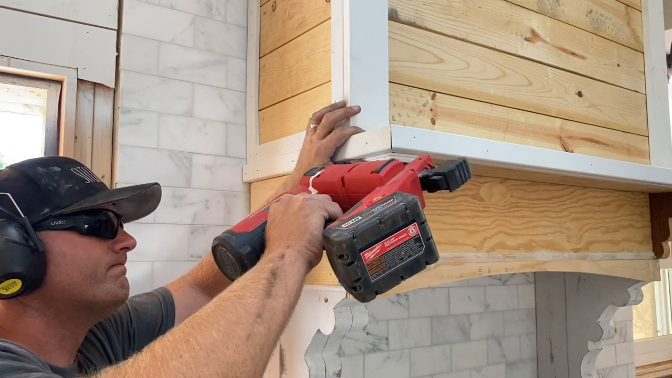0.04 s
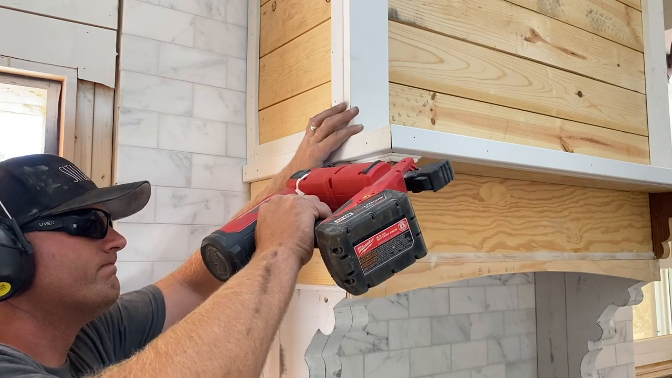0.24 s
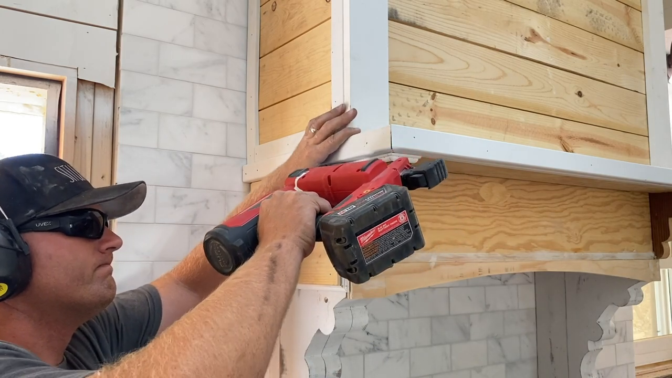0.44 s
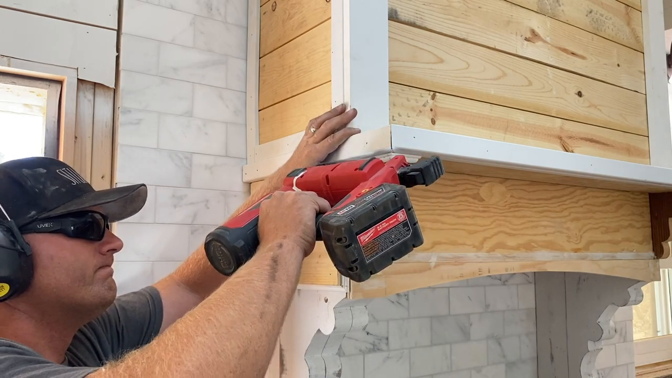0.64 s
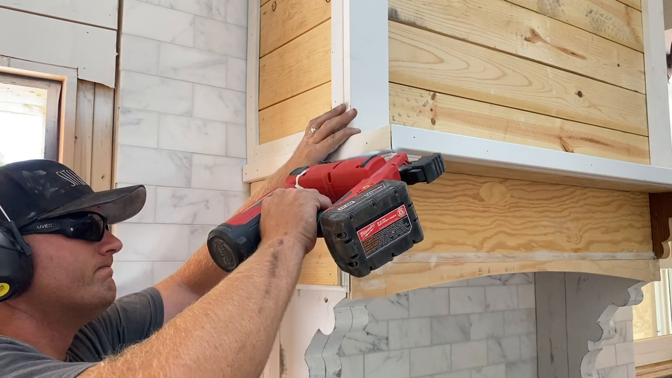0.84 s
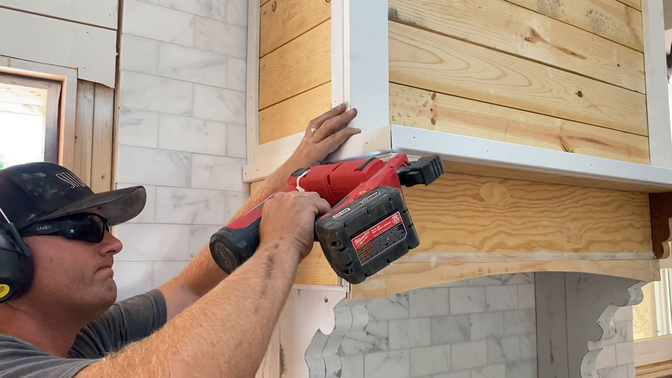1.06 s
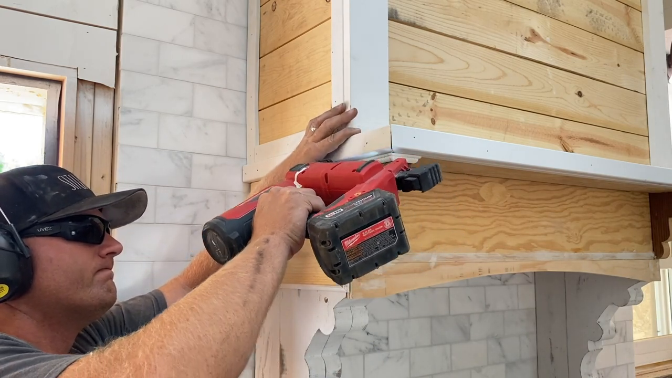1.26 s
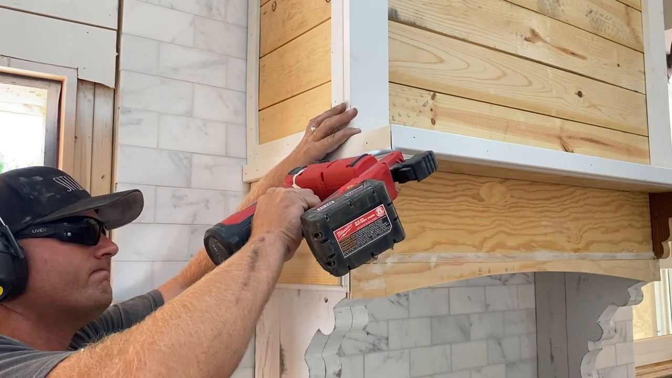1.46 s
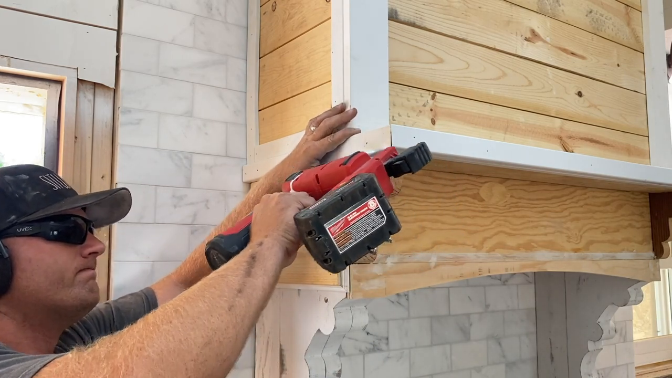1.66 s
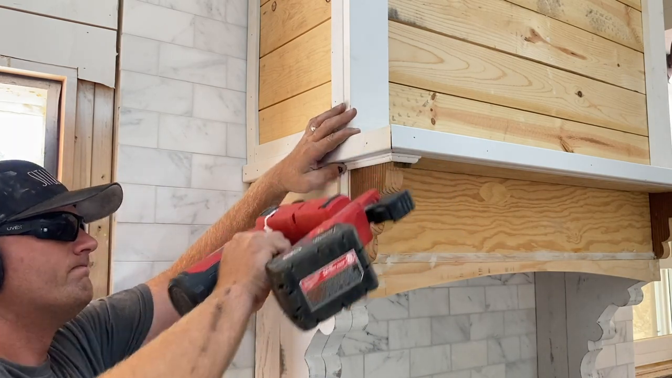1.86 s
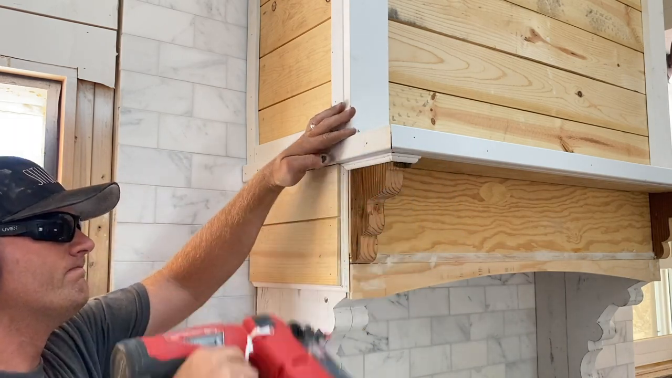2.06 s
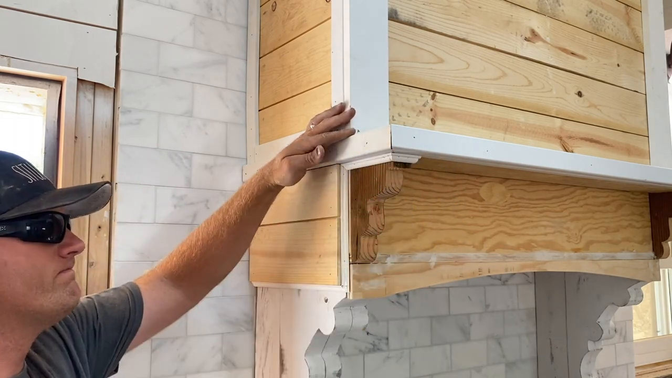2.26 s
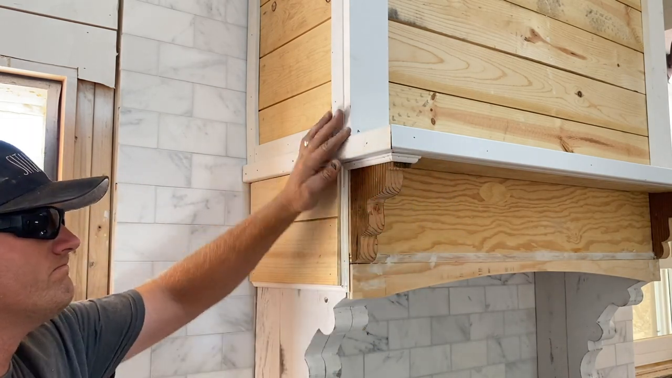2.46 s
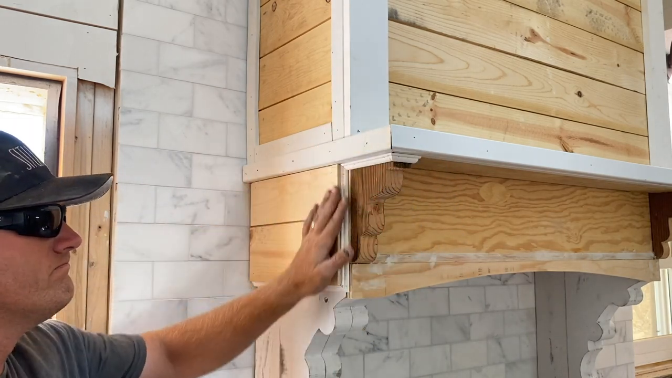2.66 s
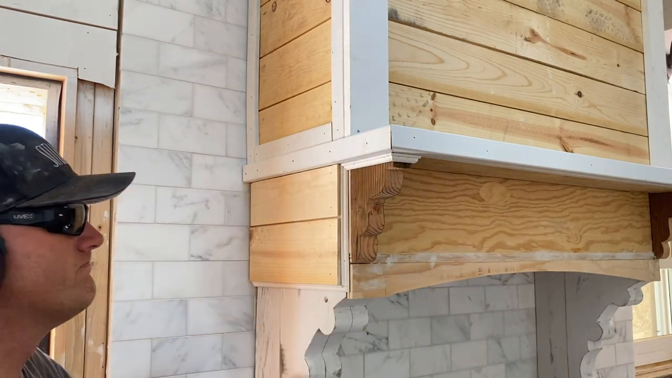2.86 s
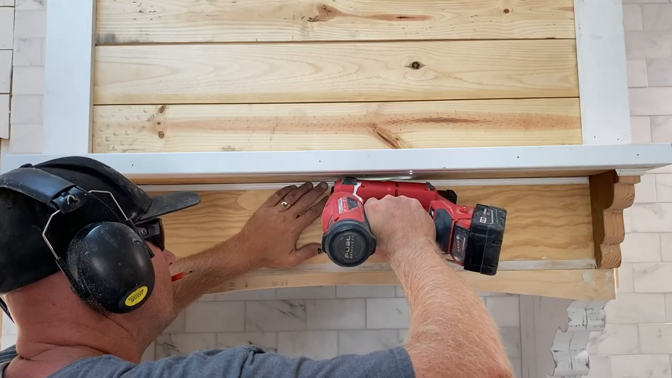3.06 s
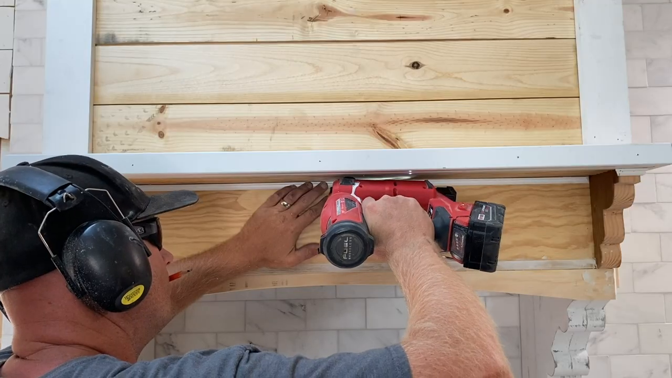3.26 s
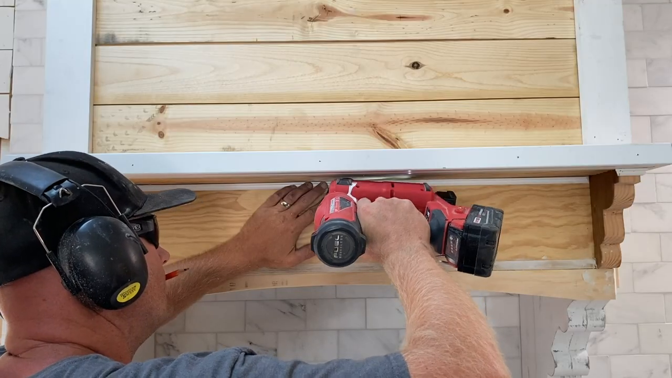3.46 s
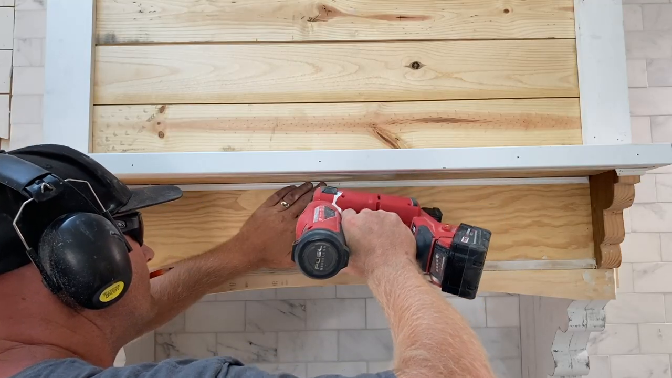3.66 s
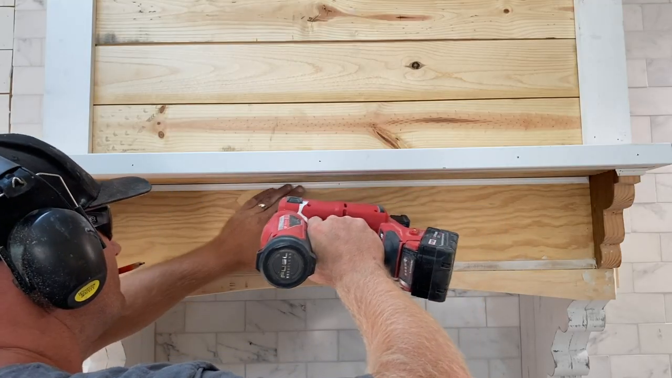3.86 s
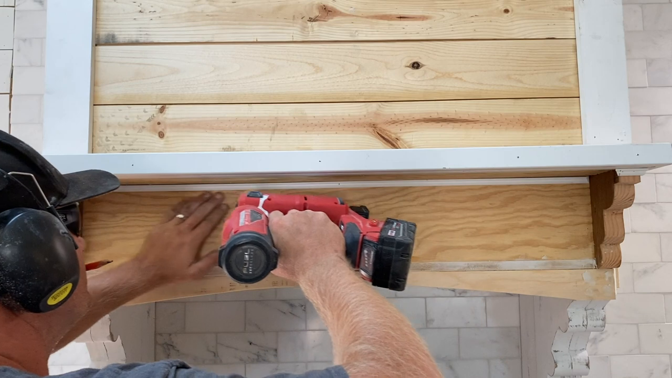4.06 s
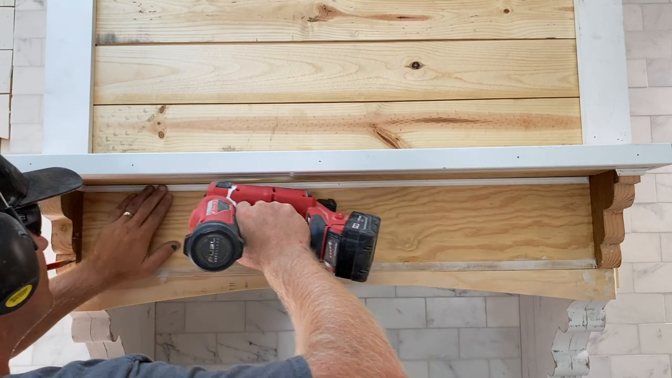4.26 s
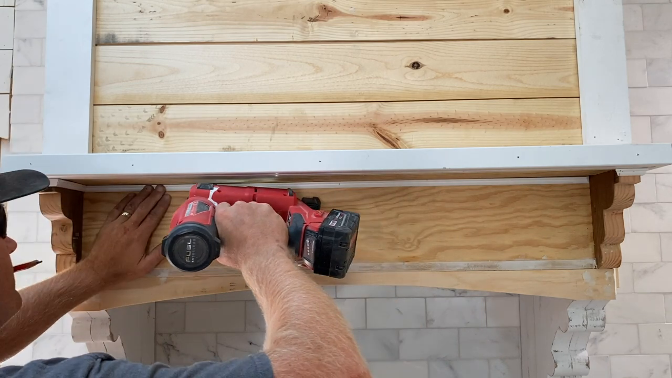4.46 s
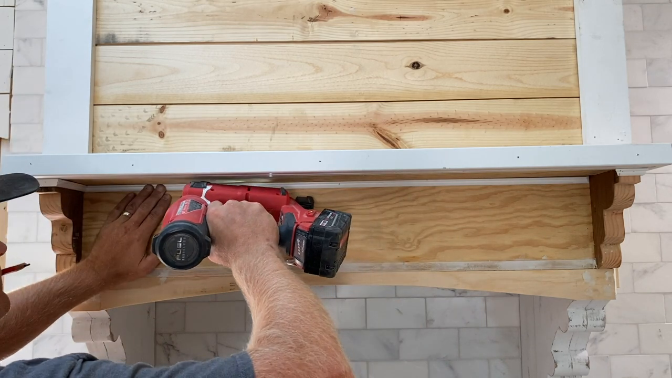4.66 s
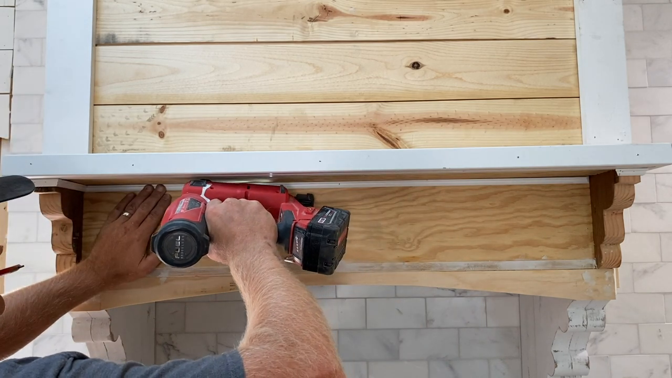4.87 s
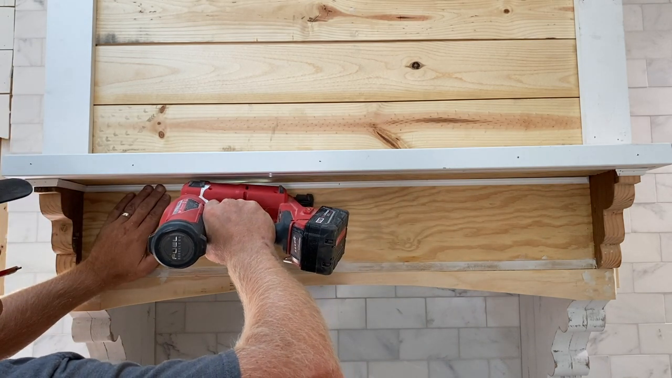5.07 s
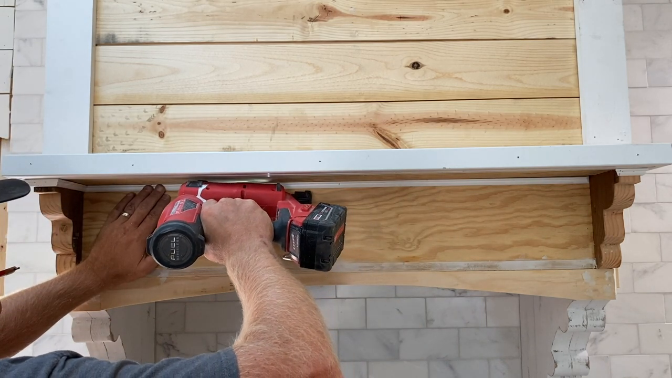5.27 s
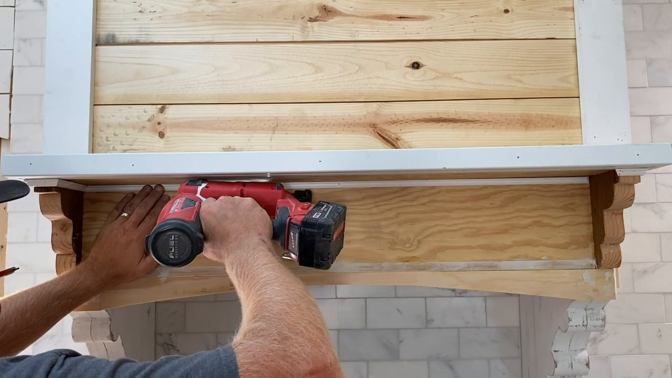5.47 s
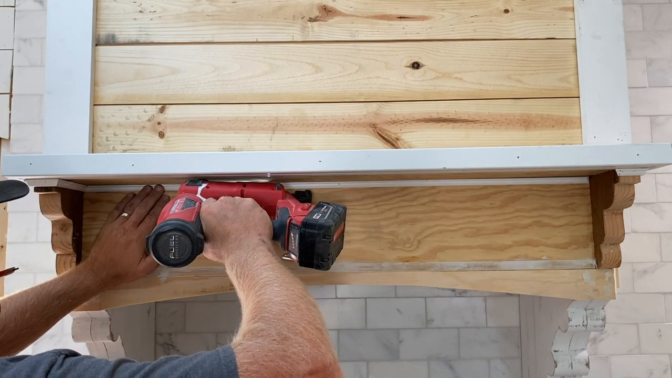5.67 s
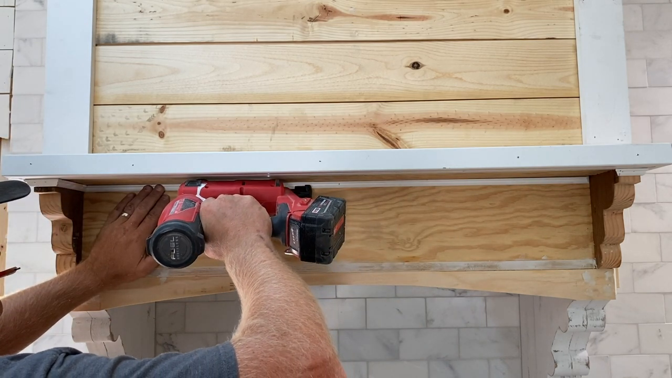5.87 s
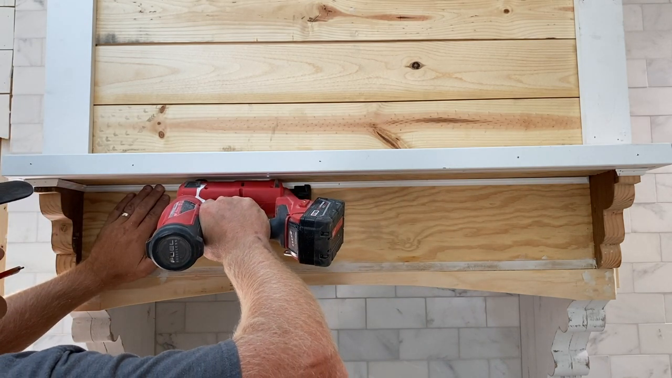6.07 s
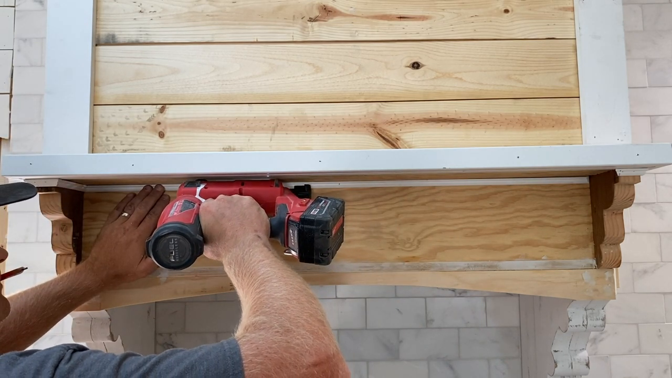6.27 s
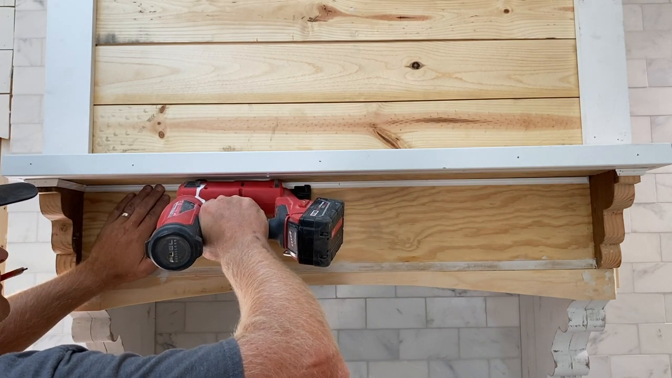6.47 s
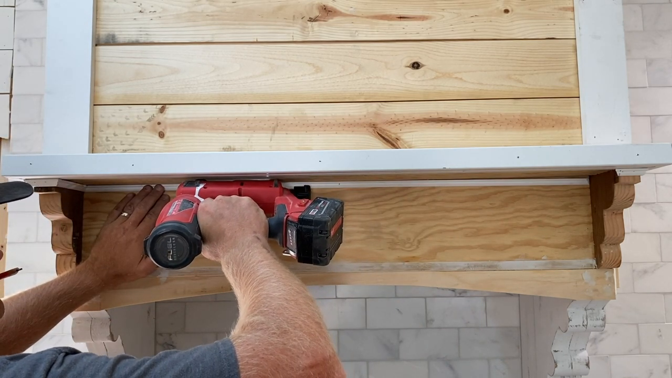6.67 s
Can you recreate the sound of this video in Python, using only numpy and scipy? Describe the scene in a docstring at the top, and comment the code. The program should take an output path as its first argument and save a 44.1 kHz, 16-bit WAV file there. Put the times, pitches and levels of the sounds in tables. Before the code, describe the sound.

Three sharp, booming nail gun shots into wooden trim, each trailed by a brief geared whine, with faint tool clicks between them indoors.

```python
"""A tiled room, the microphone close to a wooden range hood where a battery nail gun fastens trim.
At each shot the gears clack in and spin up, the driver slams the nail home and the boards boom; then the
motor winds the piston back in two pulls, slowing under each load, with a crack of the catch between.
Between shots the tool clicks on the trim, a hand slides over the wood and birds call far off outside.
Room air, a machine hum and a deep drone lie underneath, heard from beside the hood, then from in front."""
import sys
import numpy as np
from scipy import signal
from scipy.fft import rfft, irfft, next_fast_len
from scipy.io import wavfile

SR = 44100
rng = np.random.default_rng(int(sys.argv[2]) if len(sys.argv) > 2 else 0)


def log_audio(samples):
    """Write samples as a 16-bit WAV file to the path given in sys.argv[1]."""
    # one column per channel
    frames = np.atleast_2d(samples).T
    # limit to full scale, then quantise
    limited = np.clip(frames, -1, 1)
    pcm = np.round(limited * 32767).astype(np.int16)
    wavfile.write(sys.argv[1], SR, pcm)


N = 296339
LEAD = SR // 2  # samples before time zero, so the scene opens on the end of a shot
TIME = np.arange(-LEAD, N) / SR

# The shots, close up. Each row: firing time in seconds, base levels in dB of spin-up, driver, thump, boom
# and crack, the crack's ring in Hz, base levels in dB of gear rattle and whine, brightness from 0 to 1.
SHOTS = [(-.209, -24.5, -9, -16.5, -23, -2, 3770, -31.5, -32.5, 0.71),
         (1.6670, -24, -8.5, -14, -23, -4, 4550, -30, -32.5, .85),
         (3.2540, -23, -10, -18, -20.5, -6.5, 3180, -31.5, -30, .42),
         (6.5675, -21.5, -10, -16.5, -22, -5, 3150, -30, -31.5, .5)]
BRIGHTNESS_TILT_DB = 1.5  # per octave: a gun turned toward the microphone sounds brighter
# Gears clacking in and biting. Each row: start in seconds, level in dB, ring in Hz, share of ring.
GEAR_CLACKS = [(1.6385, -17.5, 3780, 0.8), (1.658, -18.5, 1256, .7), (3.2017, -25, 3510, 0.38),
               (3.2075, -16.5, 2540, .25), (3.225, -25, 3700, 2.5), (3.241, -15, 3430, 1.4),
               (6.5388, -16.5, 3540, 1.1), (6.559, -17.5, 3280, 1.9)]
# The two pulls on the piston. Each row: end in seconds after firing, time under load in seconds,
# mesh rate at full load in Hz, level boost in dB.
PISTON_PULLS = [(0.1352, .1, 1643, 1), (.256, .089, 1537, 1.5)]
SPIN_FROM_HZ, FIRING_HZ, FREE_HZ = 1000, 1401.4, 2002  # mesh rates: spinning up, firing, unloaded
# The whine of the gears. Each row: multiple of the mesh rate, relative level in dB.
GEAR_TONES = [(1, -6.5), (2, -4.5), (2.4, -3.5), (3, -7.5), (4, -8), (4.5, -16), (5, -8.5), (6.001, -9),
              (7, -15)]
# Gearbox resonances that swell a passing tone. Each row: centre in Hz, width in Hz, added gain.
GEARBOX_RESONANCES = [(3660, 550, 2.1), (5150, 350, 1.5), (7600, 770, .7)]
# The colour of each part, struck or rubbed. Each row: frequency in Hz, relative level in dB.
HOUSING_SPECTRUM = [(100, -36.5), (350, -10.5), (800, 0), (1300, -7), (2000, -6.5), (3200, -2.5),
                    (4200, -6.5), (5200, -4), (6100, -11), (7600, -7), (10000, -12), (13000, -15.5),
                    (16000, -21)]
DRIVER_SPECTRUM = [(100, -20), (400, -1.5), (900, 9), (1600, -6), (3000, 0.5), (4000, -7), (5200, -7.5),
                   (6200, -11), (7500, -3.5), (9000, -10), (10400, -6), (12000, -12.5), (16000, -18)]
CATCH_SPECTRUM = [(100, -24), (300, -9.5), (750, 4), (1400, -8), (2700, -1), (3900, -6), (4600, -1),
                  (6000, -6.5), (7300, -2), (9000, -9), (11000, -9.5), (13000, -17), (16000, -19.5)]
BOARD_SPECTRUM = [(25, -27.5), (55, -10.5), (95, 2.5), (260, -6.5), (420, 1.5), (600, -3), (800, -3),
                  (1300, 0.5), (1800, -7), (2800, -8), (5000, -25), (12000, -46)]
TIP_SPECTRUM = [(710, -33), (1200, -6), (2320, -7.5), (2790, -2), (3910, -5.5), (4360, -1), (6800, -5),
                (8530, -3.5), (9310, -6), (14000, -13.5), (16000, -32)]
SKIN_SPECTRUM = [(300, -15), (1800, 0), (3500, -1), (6000, -4), (9000, -5.5), (12000, -7.5), (16000, -13.5)]
# The hood's ringing boards. Each row: pitch in Hz, relative level in dB, seconds to fall 60 dB.
BOARD_MODES = [(167.9, 4, .35), (213, -5.5, .3), (384.5, -4, 0.51), (419, -7, 0.46), (584, -2.5, .3),
               (785.4, -2, 0.9), (1000, -7.5, 0.43), (1136, -2.5, 0.42), (1258, -2.5, .35)]
# Tip and trigger clicks. Each row: start in seconds, level in dB, decay in seconds, tilt in dB an octave.
TOOL_CLICKS = [(0.8244, -40.5, 0.0081, -1), (.874, -49, .003, -6), (1.1343, -46, .007, -9),
               (1.5824, -49.5, 0.01, -2), (1.618, -45.5, .006, -5.5), (2.209, -40, 0.0036, -2.5),
               (2.965, -55, .0014, -2.5), (3.133, -50, 0.0025, -7), (3.1465, -47, 0.0061, -4),
               (3.182, -41.5, .003, -2.5), (4.859, -42.5, 0.0056, -4), (4.869, -37.5, 0.0023, -5.5),
               (4.957, -50.5, 0.0022, -5.5), (5.063, -50.5, 0.0031, -7), (5.226, -52.5, 0.0023, -13.5),
               (5.753, -48, 0.0019, 0), (6.466, -51, .0018, -7), (6.484, -45, 0.0032, -1.5),
               (6.5174, -45, 0.0047, -2.5)]
# A brief low hum fading away, then soft bumps against the hood.
# Each row: start in seconds, level in dB, pitch in Hz, decay in seconds.
BRIEF_HUM_AND_BUMPS = [(2.97, -45, 107.5, 0.14), (4.86, -45.5, 747, 0.013), (5.954, -36, 275.3, 0.027),
                       (5.99, -34.5, 72.1, 0.041), (6.111, -47, 69, 0.035), (6.106, -44.5, 398, 0.021),
                       (6.241, -43.5, 60.9, 0.055)]
# A hand on the wood. Each row: start and length in seconds, level in dB, tilt in dB an octave.
HAND_STROKES = [(2.478, .14, -65, 3.5), (2.593, 0.12, -61.5, 4.5), (2.727, 0.11, -56.5, -1),
                (2.892, 0.049, -57, -5.5), (3.819, 0.086, -59.5, -7), (4.321, .06, -70.5, -4.5),
                (5.822, 0.49, -67.5, -7.5)]
# Thin, far whistles. Each row: start and length in seconds, pitch in Hz, share of pitch lost, level in dB.
BIRD_WHISTLES = [(.36, 0.27, 2650, 0.017, -73.5), (0.646, 0.093, 2660, 0.11, -74),
                 (0.737, .14, 3080, .03, -76), (1.332, 0.17, 2154, 0.066, -75),
                 (2.224, .24, 2634, 0.29, -70), (4.762, .1, 3050, .04, -71),
                 (5.389, .16, 3300, 0.042, -69.5), (5.56, .17, 3220, 0.042, -71.5),
                 (6.146, 0.15, 3350, 0.065, -66)]
# Raspy, far chirps. Each row: start and length in seconds, opening pitch in Hz, level in dB.
BIRD_CHIRPS = [(2.942, .2, 4550, -69.5), (3.92, .08, 4060, -74.5), (4.119, .16, 4390, -76),
               (4.387, .16, 4170, -69), (4.717, 0.14, 3850, -68.5), (5.201, 0.11, 4740, -67.5),
               (5.348, 0.16, 4290, -67), (5.531, .15, 3860, -67.5), (6.122, .18, 4040, -67)]
# The decay of the tiled room. Each row: frequency in Hz, seconds to fall 60 dB.
ROOM_DECAY = [(100, .4), (400, .73), (1500, .77), (3500, .62), (6000, .52), (10000, .41), (16000, .32)]
# Room air beside the hood and in front of it. Each row: frequency in Hz, relative level in dB.
SIDE_AIR = [(12, -48.5), (20, -24), (53, -3.5), (88, -6.5), (120, -1), (150, -4), (172, -8), (310, -3.5),
            (388, -12), (422, -12), (949, -16), (1760, -30.5), (2460, -39), (2820, -40), (16000, -68)]
FRONT_AIR = [(12, -41), (20, -30), (53, -4.5), (113, -2), (182, -4), (198, -9.5), (357, -8), (388, -16.5),
             (472, -8), (590, -17), (660, -13), (1000, -25), (2200, -37.5), (5530, -45.5), (16000, -74)]
MIC_MOVE_S = 2.965  # the microphone goes from the side to the front
# A steady machine hum. Each row: pitch in Hz, level in dB.
HUM_TONES = [(133, -59), (177.5, -58.5), (221, -63), (266, -67.5), (312, -64), (355, -63.5), (533, -68.5)]
# A deep drone that comes and goes in front of the hood. Each row: time in seconds, level in dB.
DRONE_LEVELS = [(3.5, -60), (3.69, -45.5), (3.8, -54), (4.21, -47.5), (4.52, -54), (4.56, -71.5),
                (4.83, -50.5), (5.1, -48.5), (5.22, -62.5), (5.9, -53)]


def nail_gun():
    """Every shot, close to the microphone; returns the gears (rattle, whine) and the blows."""
    gears, blows = np.zeros((2, len(TIME))), np.zeros(len(TIME))
    for s, spin_db, driver_db, thump_db, boom_db, crack_db, crack_hz, rattle_db, whine_db, bright in SHOTS:
        tilt_db = BRIGHTNESS_TILT_DB * (bright - .5)
        add(gears, s - .029, spin_up(spin_db, bright, length_s=.029))
        driver = blow(DRIVER_SPECTRUM, driver_db, rise_s=.0056, decay_s=.0026, tilt_db=1.3 + tilt_db)
        add(blows, s, driver)
        add(blows, s + .002, boards(thump_db, boom_db))
        add(gears, s, wind_back(rattle_db, whine_db, bright))
        catch = blow(CATCH_SPECTRUM, crack_db, rise_s=.0021, decay_s=.0027, tilt_db=.48 + tilt_db,
                     ring_hz=crack_hz, ring_share=.37)
        add(blows, s + .135, catch)
    for s, db, ring_hz, ring_share in GEAR_CLACKS:
        clack = blow(HOUSING_SPECTRUM, db, rise_s=.0032, decay_s=.0075, tilt_db=1.6,
                     ring_hz=ring_hz, ring_share=ring_share)
        add(blows, s, clack)
    return gears, blows


def blow(spectrum, db, rise_s, decay_s, tilt_db, ring_hz=3000, ring_share=0, size=4096):
    """A blow on hard parts: a dense cluster of short resonances, one of which may stand out."""
    t = np.arange(size) / SR
    shape = strike(t, rise_s, decay_s)
    cluster = rfft(shape * rng.standard_normal(size))
    cluster /= (abs(cluster) + 1e-9) ** .22  # evens out the noise's spectrum for a smoother crack or click
    body = colour(irfft(cluster), spectrum, tilt_db) * signal.windows.hann(2 * size)[size:]
    ring = unit(shape * np.sin(2 * np.pi * ring_hz * t))
    return amp(db) * unit(unit(body) + ring_share * ring) * np.sqrt(np.mean(shape ** 2))


def boards(thump_db, boom_db, high_hz=1000, low_hz=130, heave_hz=110, size=32768):
    """Bending waves arrive highs first, as a falling thump; the panel heaves, the hood booms and rings."""
    t = np.arange(size) / SR
    hz = low_hz + (high_hz - low_hz) * np.exp(-t / .0055)
    thump = np.sin(2 * np.pi * np.cumsum(hz) / SR) * np.sqrt(2 * strike(t, .0061, .005))
    swing = 2 * np.pi * heave_hz * (t - .012)
    heave = amp(-6) * 2 * swing * np.exp(-swing ** 2 / 2)
    boom = colour(rng.standard_normal(size), BOARD_SPECTRUM) * strike(t, rise_s=.005, decay_s=.066)
    modes = sum(amp(db - 60 * t / t60) * np.sin(2 * np.pi * (f * t + rng.random()))
                for f, db, t60 in BOARD_MODES)
    ring = amp(-10) * modes * np.minimum(t / .005, 1)
    return amp(thump_db) * (thump + heave) + amp(boom_db) * (boom + ring)


def spin_up(db, brightness, length_s, swell_db=8.5):
    """The motor gathers speed and loudness until the driver is let go."""
    progress = np.linspace(0, 1, round(length_s * SR))
    mesh_hz = SPIN_FROM_HZ + (FIRING_HZ - SPIN_FROM_HZ) * progress
    rattle_db = db + swell_db * (progress - 1)
    return gear_train(mesh_hz, rattle_db, rattle_db + 2.5, brightness)


def wind_back(rattle_db, whine_db, brightness, load_rattle_db=5.5, load_whine_db=8, brake_s=.005):
    """The motor pulls the piston back, louder as the load grows, then brakes."""
    stop_s = PISTON_PULLS[-1][0]
    t = np.arange(0, stop_s + 10 * brake_s, 1 / SR)
    mesh_hz, load, boost_db = piston_pulls(t)
    rattle_db = rattle_db + boost_db + load_rattle_db * (load - 1)
    whine_db = whine_db + boost_db + load_whine_db * (load - 1)
    brake = np.exp(-np.maximum(t - stop_s, 0) / brake_s)
    return gear_train(mesh_hz, rattle_db, whine_db, brightness) * brake


def piston_pulls(t, run_up_hz_per_s=16000, sag_power=1.7):
    """Freed of load the motor races up; as the piston compresses it sags, fast at first, then levels."""
    mesh_hz, load, boost_db = np.zeros((3, len(t)))
    start, start_hz = 0, FIRING_HZ
    for end, loaded_s, loaded_hz, pull_db in PISTON_PULLS:
        now = t >= start
        load[now] = 1 - np.clip((end - t[now]) / loaded_s, 0, 1) ** sag_power
        sagging_hz = FREE_HZ + (loaded_hz - FREE_HZ) * load[now]
        racing_hz = start_hz + run_up_hz_per_s * (t[now] - start)
        mesh_hz[now] = np.minimum(sagging_hz, racing_hz)
        boost_db[now] = pull_db
        start, start_hz = end, loaded_hz
    return mesh_hz, load, boost_db


def gear_train(mesh_hz, rattle_db, whine_db, brightness, grain_db=3, chatter_db=.66, wobble=.004):
    """Gear teeth rattle the housing and whine at multiples of the mesh rate; returns (rattle, whine)."""
    size = len(mesh_hz)
    cycles = np.cumsum(mesh_hz * (1 + wobble * band(0, 150, size))) / SR
    tooth_force = amp(grain_db * band(0, 900, size) + chatter_db * band(90, 120, size))
    teeth = rng.standard_normal(size) * tooth_force * (1 + .5 * np.cos(2 * np.pi * cycles))
    dull, sharp = colour(teeth, HOUSING_SPECTRUM, -3), colour(teeth, HOUSING_SPECTRUM, 3)
    rattle = unit((1 - brightness) * dull + brightness * sharp)
    whine = np.zeros(size)
    for multiple, db in GEAR_TONES:
        hz = multiple * mesh_hz
        swell = 1 + sum(gain / (1 + (2 * (hz - f) / width) ** 2) for f, width, gain in GEARBOX_RESONANCES)
        dulling_db = BRIGHTNESS_TILT_DB * (brightness - 1) * np.log2(multiple)
        tone = np.sin(2 * np.pi * (multiple * cycles + rng.random()))
        fuzz = .3 * band(hz, 130, size)
        whine += amp(db + dulling_db) * swell * (tone + fuzz)
    return np.array([amp(rattle_db) * rattle, amp(whine_db) * unit(whine)])


def clicks_and_low_sounds(size=16384):
    """The tip and trigger click; a brief low hum fades away, and later come soft bumps on the hood."""
    out, t = np.zeros(len(TIME)), np.arange(size) / SR
    for s, db, decay_s, tilt_db in TOOL_CLICKS:
        add(out, s, blow(TIP_SPECTRUM, db, .00026, decay_s, tilt_db))
    for s, db, hz, decay_s in BRIEF_HUM_AND_BUMPS:
        add(out, s, amp(db) * band(hz, .56 * hz, size) * strike(t, .012, decay_s))
    return out


def hand(grain_db=2.8):
    """Skin catches and slips on the grain of the wood; each stroke swells faster than it fades."""
    out = np.zeros(len(TIME))
    for s, length, db, tilt_db in HAND_STROKES:
        size = round(length * SR)
        slips = rng.standard_normal(size) * amp(grain_db * band(0, 400, size))
        stroke = np.sin(np.pi * np.linspace(0, 1, size) ** .8)
        add(out, s, amp(db) * stroke * colour(slips, SKIN_SPECTRUM, tilt_db))
    return out


def birds(chirp_fall=.2):
    """Far off outside: whistles that droop at the end and raspy falling chirps."""
    out = np.zeros(len(TIME))
    for s, length, hz, fall, db in BIRD_WHISTLES:
        progress = np.linspace(0, 1, round(length * SR))
        add(out, s, bird_note(hz * (1 - fall * progress ** 2), db, width_hz=75))
    for s, length, hz, db in BIRD_CHIRPS:
        progress = np.linspace(0, 1, round(length * SR))
        add(out, s, bird_note(hz * (1 - chirp_fall * progress), db, width_hz=790))
    return out


def bird_note(hz, db, width_hz, flutter_db=2):
    """One note along the pitch hz, with a flutter in its level."""
    size = len(hz)
    note = band(hz, width_hz, size) * amp(flutter_db * band(60, 80, size))
    return amp(db) * unit(note) * signal.windows.tukey(size, .7)


def reflections(x, shift_lead_s=.4):
    """The gun shifts along the trim just before each shot, and each place has its own reflections."""
    place = np.searchsorted([shot[0] - shift_lead_s for shot in SHOTS[1:]], TIME)
    return sum(tiled_room(x * (place == k)) for k in range(len(SHOTS)))


def tiled_room(x, gap_s=.0031, build_s=.0037, early_decay_s=.0051):
    """Strong early reflections off the hood, then a dense tail off the tiles, dying band by band."""
    hz, t, bands = signal.stft(rng.standard_normal(SR), SR, nperseg=256)
    decay = amp(-60 * t / read(ROOM_DECAY, hz)[:, None])
    tail = signal.istft(bands * decay, SR, nperseg=256)[1]
    age = np.arange(len(tail)) / SR
    early_boost = 1 + .52 * np.exp(-age / early_decay_s)
    tail *= np.clip((age - gap_s) / build_s, 0, 1) * early_boost
    return signal.fftconvolve(x, tail / np.linalg.norm(tail))[:len(x)]


def room_air(side_db=-51.5, front_db=-50.3):
    """A low wash of air at the microphone, first beside the hood, then in front."""
    side = amp(side_db) * colour(rng.standard_normal(len(TIME)), SIDE_AIR)
    front = amp(front_db) * colour(rng.standard_normal(len(TIME)), FRONT_AIR)
    return np.where(TIME < MIC_MOVE_S, side, front)


def machine_hum(waver=.18):
    """A machine hums on a few low tones, each wavering slightly."""
    return sum(amp(db) * (np.sqrt(2) * np.sin(2 * np.pi * hz * TIME) + waver * band(hz, 15, len(TIME)))
               for hz, db in HUM_TONES)


def drone(hz=62, side_db=-67):
    """A deep tone, faint beside the hood, coming and going in front of it."""
    level_db = np.where(TIME < MIC_MOVE_S, side_db, np.interp(TIME, *np.transpose(DRONE_LEVELS)))
    return amp(level_db) * unit(np.sin(2 * np.pi * hz * TIME) + .21 * band(hz, 9.6, len(TIME)))


def amp(db):
    """Decibels to gain."""
    return 10 ** (np.asarray(db) / 20)


def unit(x):
    """Scales to rms 1."""
    return x / np.sqrt(np.mean(x ** 2) + 1e-20)


def read(points, hz):
    """Reads a table on a log-frequency axis."""
    f, value = np.transpose(points)
    return np.interp(np.log(hz + 1), np.log(f), value)


def add(mix, s, sound):
    """Mixes a sound in at s seconds."""
    part = mix[..., LEAD + round(s * SR):][..., :sound.shape[-1]]
    part += sound[..., :part.shape[-1]]


def colour(x, spectrum, tilt_db=0):
    """Gives x a spectrum, tilted by tilt_db an octave about the upper midrange, at rms 1."""
    size = next_fast_len(len(x))
    hz = np.fft.rfftfreq(size, 1 / SR)
    gain = amp(read(spectrum, hz) + tilt_db * np.log2((hz + 200) / 3500))
    return unit(irfft(rfft(x, size) * gain, size)[:len(x)])


def band(hz, width_hz, size):
    """Noise in a narrow band that follows the pitch hz."""
    pole = np.exp(-np.pi * width_hz / SR)
    noise = rng.standard_normal(size) + 1j * rng.standard_normal(size)
    slow = signal.lfilter([(1 - pole) ** 2], [1, -2 * pole, pole * pole], noise)
    carrier = np.exp(2j * np.pi * np.cumsum(hz * np.ones(size)) / SR)
    return unit((slow * carrier).real)


def strike(t, rise_s, decay_s):
    """Envelope of a blow: a quick swell, then an exponential fall."""
    return np.minimum(t / rise_s, 1) ** 2 * np.exp(-np.maximum(t - rise_s, 0) / decay_s)


def scene():
    """At one microphone: the gun and hand close by, the birds far off, the room around them."""
    (rattle, whine), blows = nail_gun()
    small = clicks_and_low_sounds() + hand()
    outside = birds()
    direct = rattle + whine + blows + small + outside
    into_room = amp(-4) * rattle + amp(-7.5) * whine + amp(-7) * blows + amp(-8.5) * small + .5 * outside
    return (direct + reflections(into_room) + room_air() + machine_hum() + drone())[None, LEAD:]


def record(dry, edge_hz=16000):
    """The loudest peaks clip at full scale, then the treble above edge_hz is cut."""
    clipped = np.clip(dry, -1, 1)
    lowpass = signal.firwin(401, edge_hz, window=("kaiser", 8), fs=SR)
    return signal.oaconvolve(clipped, lowpass[None], "same")


dry = scene()
out = record(dry)
log_audio(out)
```